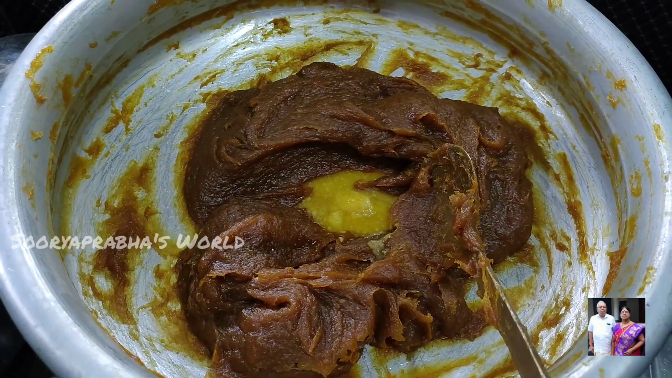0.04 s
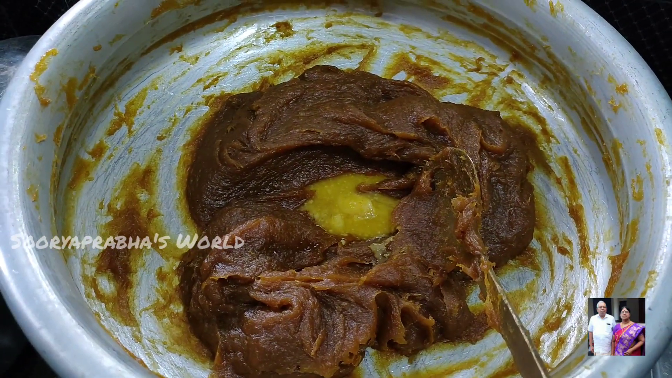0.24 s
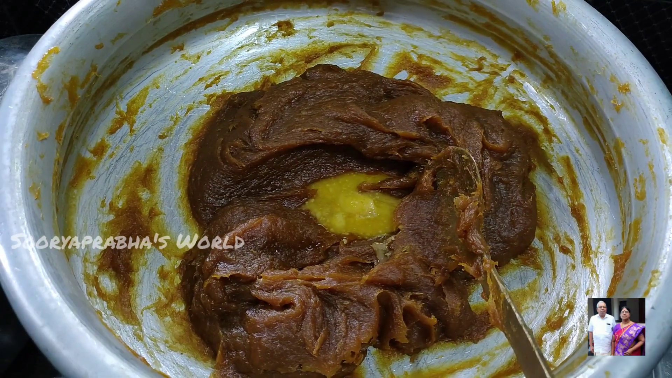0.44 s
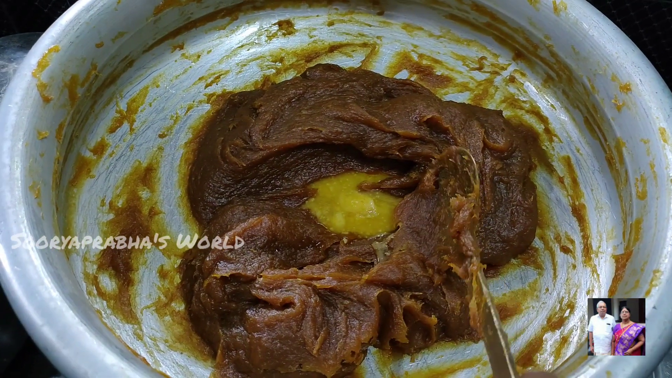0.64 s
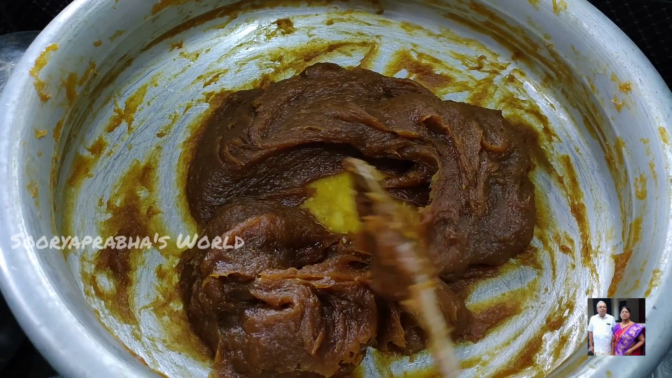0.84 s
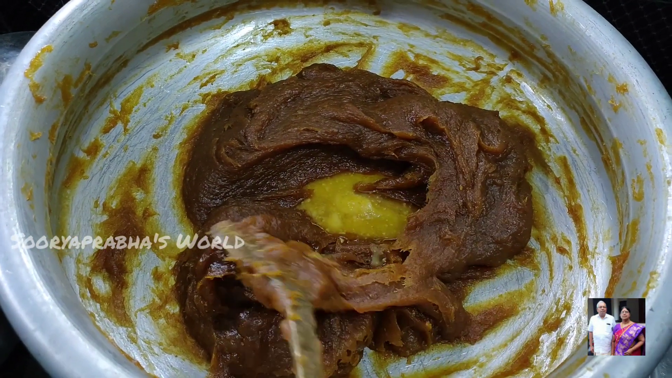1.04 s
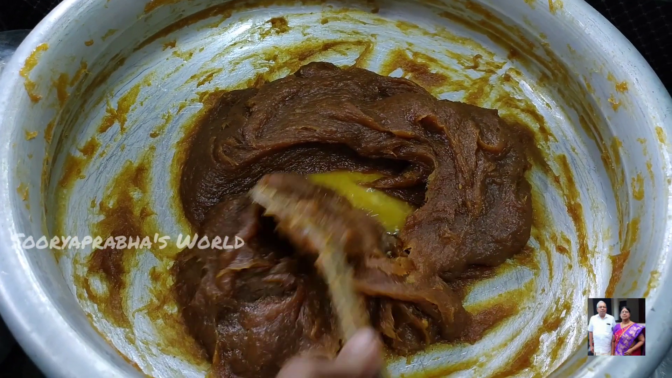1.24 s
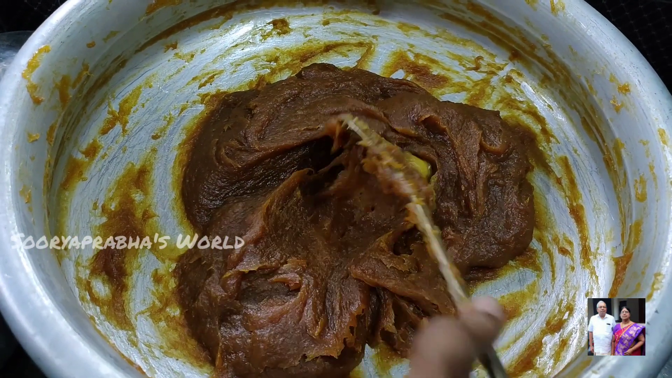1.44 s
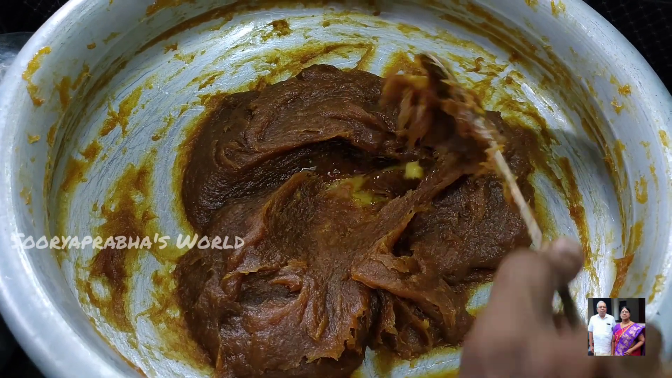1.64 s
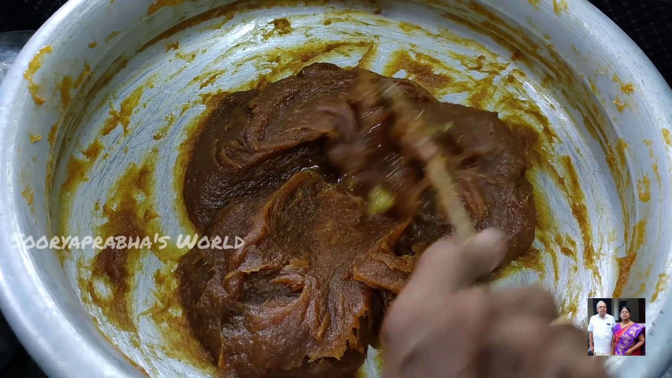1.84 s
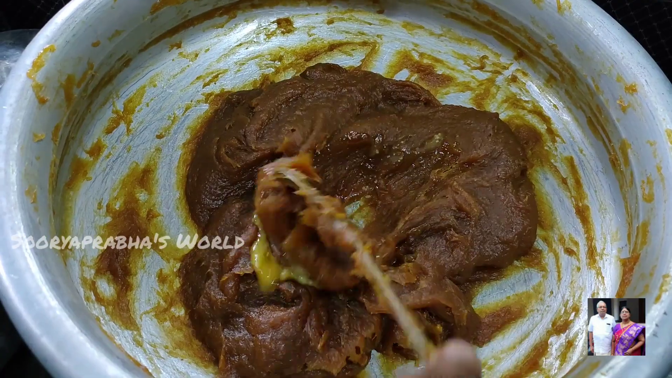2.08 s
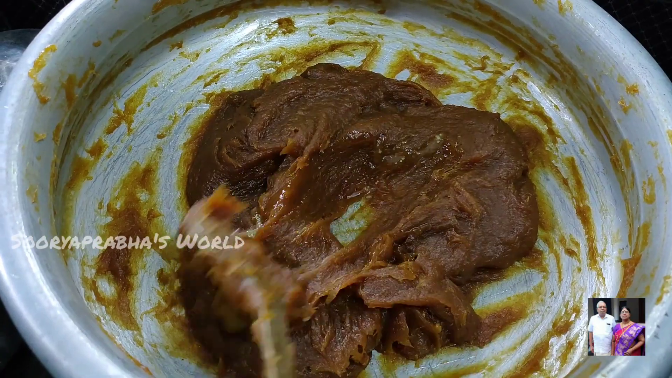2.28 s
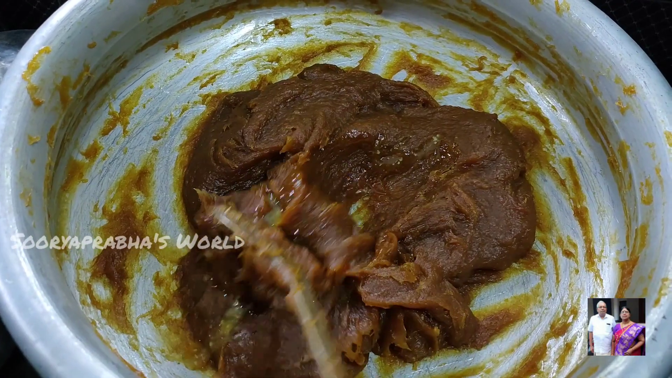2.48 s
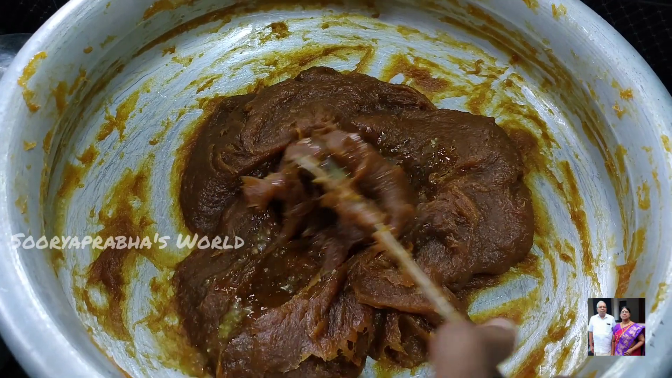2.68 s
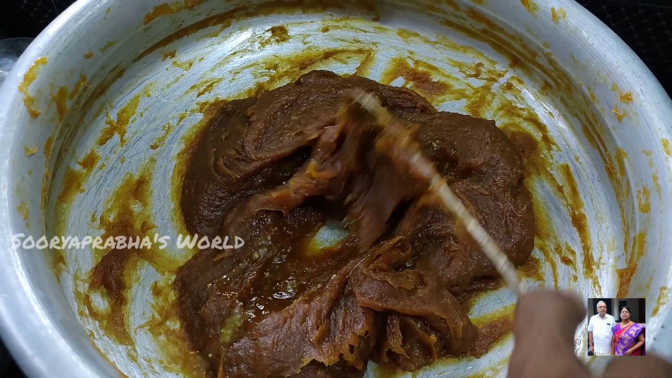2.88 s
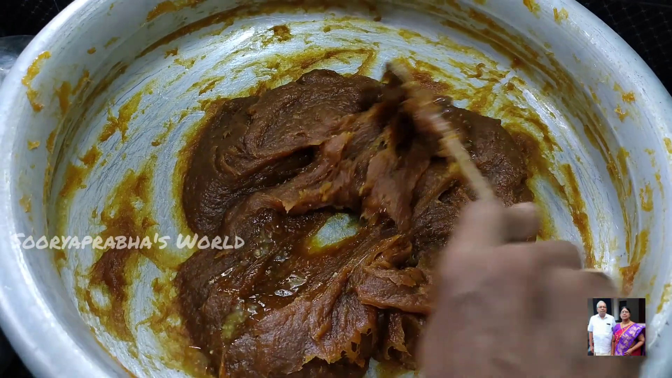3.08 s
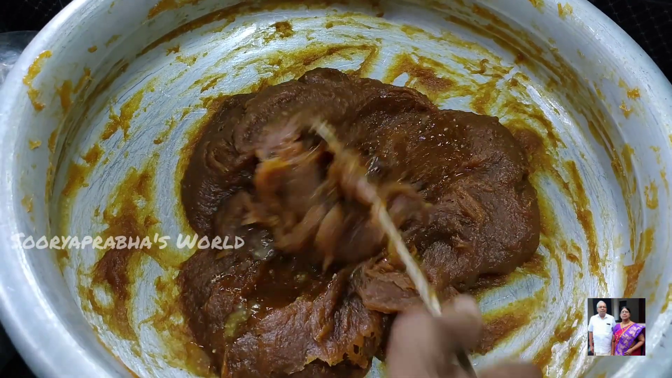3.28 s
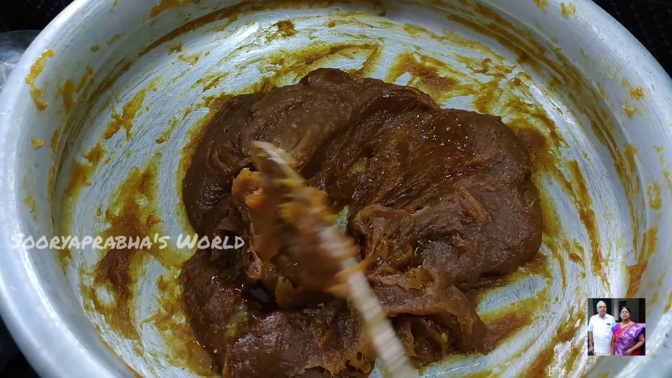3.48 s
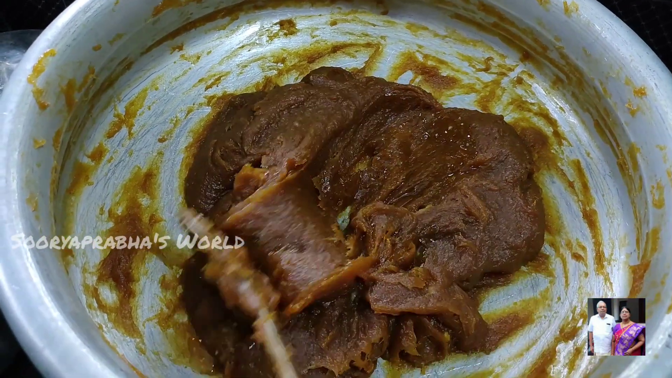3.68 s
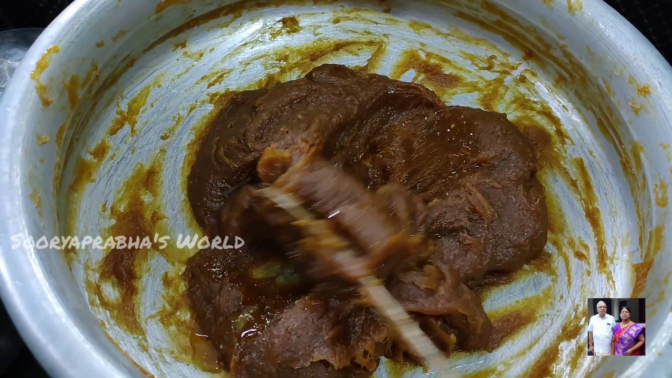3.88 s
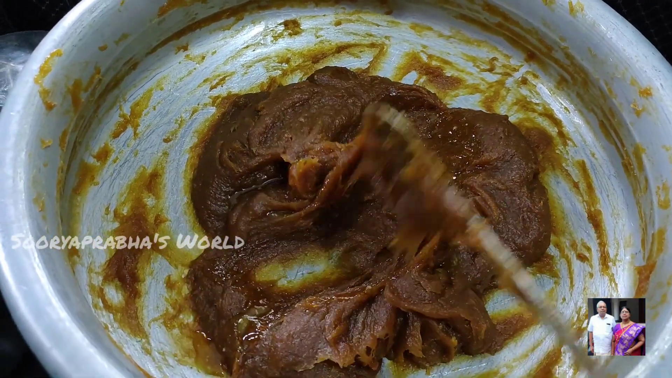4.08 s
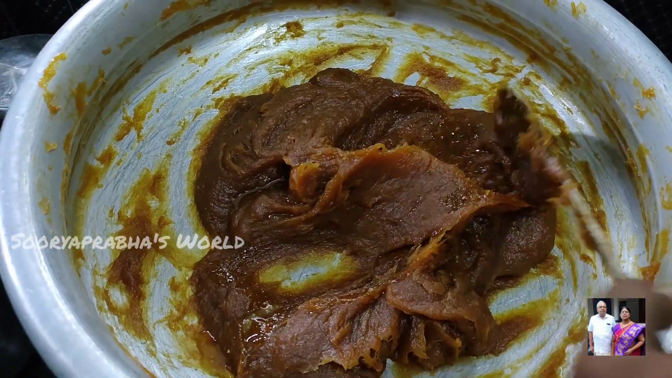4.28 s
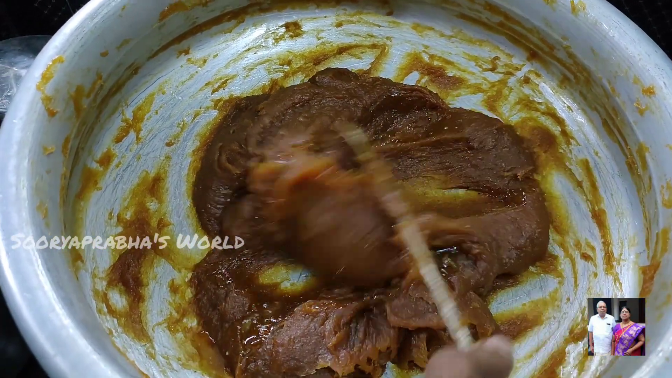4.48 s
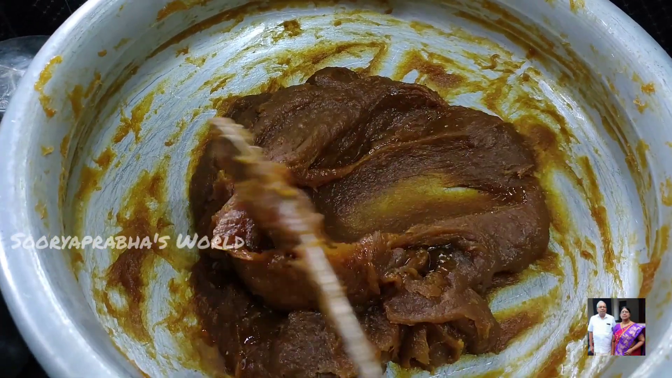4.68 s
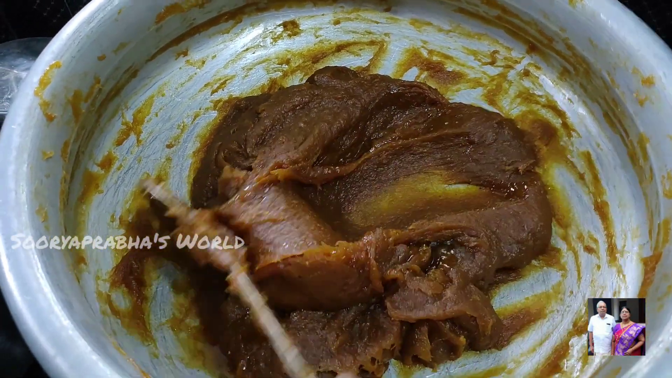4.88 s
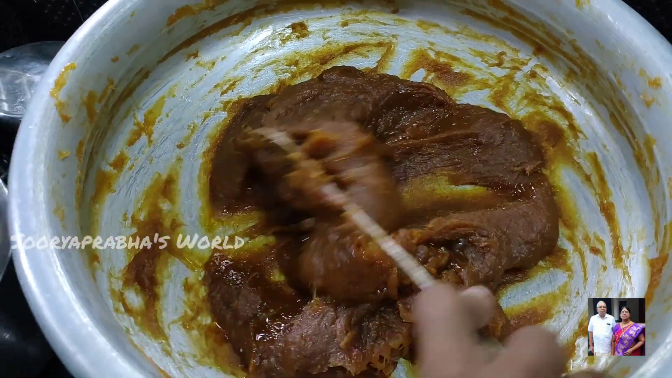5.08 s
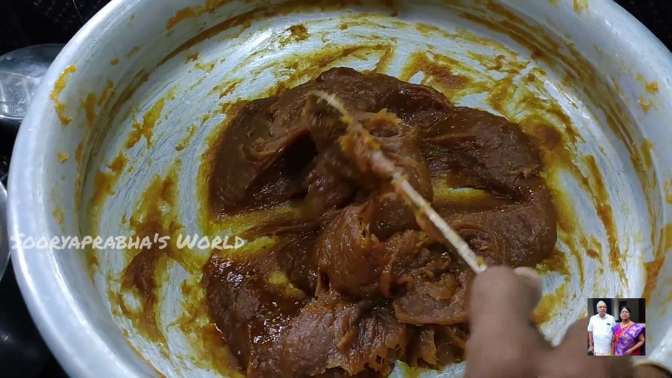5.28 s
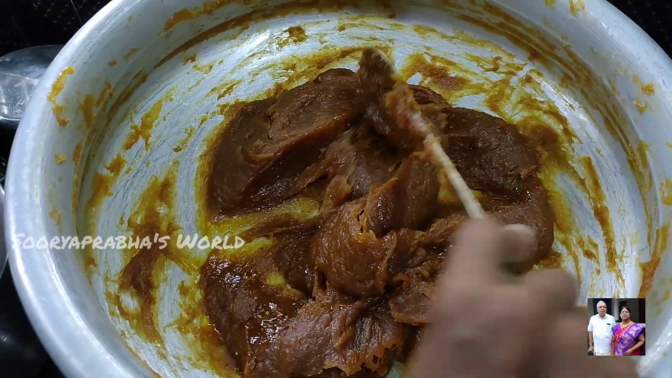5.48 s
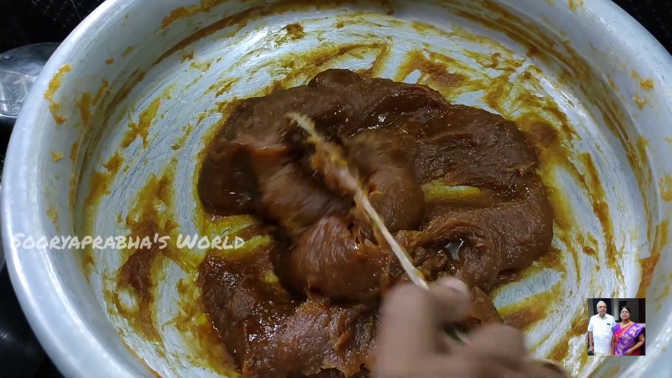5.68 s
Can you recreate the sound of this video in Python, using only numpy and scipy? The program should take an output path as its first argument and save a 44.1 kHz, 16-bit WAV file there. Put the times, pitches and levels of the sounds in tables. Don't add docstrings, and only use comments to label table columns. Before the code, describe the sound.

A metal ladle stirs dense paste in a wide metal pan. After faint sticky clicks and a blade brush, low hollow knocks and rough scrapes arrive roughly every six tenths of a second, with quiet wet peeling between. A strong blow comes late, then a bright rim rattle. Close band-limited phone sound, short kitchen reverberation, faint sizzle.

```python
import sys
import numpy as np
from scipy import signal
from scipy.fft import rfft, irfft, next_fast_len
from scipy.io import wavfile
from scipy.ndimage import uniform_filter1d, map_coordinates

SR = 44100
rng = np.random.default_rng(int(sys.argv[2]) if len(sys.argv) > 2 else 0)


def unload_wav(signal):
    wavfile.write(
        sys.argv[1],
        SR,
        np.round(np.clip(np.atleast_2d(signal).T, -1, 1) * 32767).astype(np.int16),
    )


def elevation(decibels):
    levels = np.asarray(decibels, float)
    return 10 ** (levels / 20)


N = 252781

# (time [s], main mode [dB], lower mode against it [dB], hardness [dB], push [dB])
LANDINGS = [
    (1.2510, -37.5, -7.5, 0, -36),
    (1.9625, -41.5, -5.5, 1.5, -30.5),
    (2.4964, -37.5, -18.5, 1.5, -34),
    (3.1854, -44.5, -20, -4, -26.5),
    (3.7555, -40.5, -5.5, -2, -26.5),
    (4.4262, -45, -8, -11, -29.5),
    (4.9631, -34, -1.5, 2.5, -16),
    (5.6544, -53, 3, 2.5, -28),
]
# (frequency [Hz], level [dB], T60 [s])
PAN_MODES = [(232.3, -1.86, 0.78), (286, 1, 0.55), (329.8, 0.4, 0.33), (287.4, -4, 0.066),
             (705, -14, 0.088), (122, -19, 0.99), (180, -13.5, 0.51), (392, -7, .4), (423.6, -5.5, 0.2),
             (489.4, -10.5, 0.53), (632.4, -14, 0.31), (744, -8.5, 0.12), (845, -9.5, .22),
             (928, -12, 0.14), (1150, -16, 0.29)]
# (time [s], hiss [dB], wall body against hiss [dB], pan floor against body [dB], fade [dB/s])
SKIDS = [
    (0, -54.5, -6.5, 1, 100),
    (0.157, -57.5, -22, -22, 45),
    (1.253, -43, 5.5, -3, 110.5),
    (1.963, -40.5, -1, -12.5, 122),
    (2.498, -41.5, 2, 2.5, 115),
    (3.187, -52, 0, -6, 150),
    (3.755, -52.5, 5, 8.5, 94.5),
    (4.427, -62.5, 10, 3, 97.5),
    (4.965, -31, 2.5, 5.5, 126),
    (5.589, -41, -6.5, -31, 76),
]
# (time at full pressure [s], hiss [dB], wall body against hiss [dB], hold [s], build-up [dB/s])
PUSHES = [
    (0.688, -57.5, 6.5, 0.023, 260),
    (1.407, -48.5, 1, 0.014, 89),
    (2.685, -51.5, 0.5, 0.021, 74.5),
    (3.249, -46, -2, 0.1, 131),
    (3.917, -56, 4.5, 0.0079, 67),
    (4.452, -43, -3.5, 0.0089, 598),
    (5.202, -57.5, 6, 0.033, 67),
]
# (time [s], hiss [dB], wall body against hiss [dB], length [s])
PEELS = [(0.118, -61, -20, .03), (0.372, -60, -11, 0.047), (0.576, -76, -20, 0.032),
         (0.834, -60.5, 0.5, 0.058), (0.92, -62.5, -10, 0.033), (1.176, -71.5, 7, 0.046),
         (1.583, -68, -17, 0.28), (1.758, -67.5, 1.5, 0.1), (1.808, -58, -8, 0.03), (1.912, -63, 1, 0.18),
         (2.17, -60, -30, 0.043), (2.243, -64, -30, 0.21), (2.344, -60.5, -18, 0.2), (2.81, -67, -6, 0.18),
         (3.081, -57, -6, .06), (3.497, -64, 2.5, 0.13), (3.595, -60.5, -7, 0.078), (4.05, -82, -12, 0.047),
         (4.17, -63, -13, 0.051), (4.276, -70.5, -8, 0.2), (4.596, -75, 8.5, 0.1), (4.926, -51, -11, 0.089),
         (5.286, -73.5, 14, 0.083), (5.374, -60, -9, 0.019), (5.567, -64, 4, .02)]
# (frequency [Hz], density [dB/Hz])
EDGE_HISS = [(2530, -24), (4300, -14.5), (4480, -15.5), (5020, -15.5), (5890, -5.5), (6450, -4),
             (7220, -13), (7690, -17.5), (7880, -28), (8230, -39), (10700, -72.5), (18100, -120)]
# (frequency [Hz], density [dB/Hz])
WALL_BODY = [(320, -3.5), (550, -3), (614, 4.5), (803, -2.5), (873, -2), (1780, -2.5), (2120, -1),
             (4480, -2.5), (5000, -16.5), (6500, -39.5), (11000, -120)]
# (frequency [Hz], level [dB], T60 [s], swell [s])
RIM_MODES = [(1178, -43, .65, .02), (1301, -46, .9, .012), (1828, -51, .4, .005), (2062, -42, .45, .008),
             (2081, -41, .55, .008), (2989, -48, .4, .01), (3707, -49, .35, .015), (3776, -51, .3, .004),
             (3959, -49, .7, .012), (4007, -52, .25, .003), (4422, -38, .22, .004), (5337, -43, .3, .002),
             (5667, -46, .35, .002), (5727, -43, .28, .004), (5780, -45, .4, .002), (5851, -37, .25, .002),
             (5872, -34, .28, .003), (6455, -42, .2, .005), (6920, -46, .3, .002), (6979, -42, .35, .001),
             (7021, -39, .28, .002), (7107, -42, .22, .006), (7406, -51, .35, .012), (7626, -54, .25, .012)]
# (frequency [Hz], level [dB], T60 [s], swell [s])
BLADE_MODES = [(280, -69.5, 0.72, 0.017), (503, -64.5, 0.62, 0.036), (640, -62.5, 0.53, 0.03),
               (745, -52, .3, 0.023), (1027, -51, 0.24, 0.029), (1174, -44, 0.34, 0.056),
               (1290, -43.5, 0.39, 0.074), (1250, -79, 1.7, .06), (1345, -51, 0.35, 0.028),
               (1820, -59, 0.34, 0.037), (2073, -50.5, 0.29, 0.034), (2770, -63, 0.41, .03),
               (2770, -59.5, 0.58, .06), (2840, -67, 0.81, .03), (3569, -61, 0.18, 0.043),
               (4500, -61, 0.43, .05), (5270, -64.5, .35, .03), (5660, -56, 0.33, .05),
               (6260, -62, 0.48, 0.033), (6450, -64, 0.42, .03), (7140, -60, 0.43, .03)]
# (time [s], peak [dB], pitch [Hz], T60 [s])
TICKS = [(0.0245, -47, 6080, 0.076), (0.156, -48.5, 5800, 0.11), (0.6862, -50, 6620, 0.06),
         (0.745, -49.5, 6600, 0.088), (1.6551, -58.5, 6270, 0.086), (1.7796, -57, 6030, 0.06),
         (1.81, -57.5, 1100, 0.11), (1.9006, -60, 6200, .08), (2.8968, -54.5, 3000, 0.042),
         (3.089, -61, 3720, 0.063), (3.092, -57.5, 2400, 0.093), (4.0567, -55, 5630, 0.044),
         (4.1596, -54, 6350, 0.12), (4.8509, -57, 6200, 0.022), (4.9062, -67, 2400, 0.063),
         (4.9362, -35, 5860, 0.017), (4.94, -57, 6100, 0.13), (4.9523, -41, 5950, 0.048)]
# (time [s], length [s], pitch [Hz], width [Hz], level [dB])
SLIDES = [(0, 0.11, 1150, 260, -55), (.19, 0.4, 1230, 320, -75.5), (0.375, 0.27, 1760, 350, -74.5),
          (0.67, 0.13, 122, 9.4, -73), (1.028, 0.36, 1720, 700, -77), (1.899, 0.088, 290, 450, -60),
          (2.407, 0.045, 640, 130, -69), (2.901, 0.11, 1254, 120, -79.5), (3.063, 0.17, 636, 13, -75),
          (3.495, 0.055, 624, 450, -64), (3.622, 0.14, 1254, 17, -76), (4.7, 0.14, 1245, 76, -81),
          (5.2, .2, 640, 150, -65), (5.46, .1, 1245, 50, -79), (3.852, 0.2, 122, 17, -71),
          (4.442, 0.065, 4250, 530, -48.5), (4.445, 0.028, 6510, 70, -35.5), (4.44, 0.035, 7300, 150, -47),
          (4.805, 0.028, 6380, 88, -62.5), (5.567, 0.022, 6300, 540, -77)]
# (time [s], length [s], level [dB])
TREMBLES = [
    (.005, 0.15, -65.5),
    (0.157, 0.11, -62),
    (0.286, 0.14, -67.5),
    (0.379, 0.06, -71),
]
# (frequency [Hz], width [Hz], level [dB])
LADLE_TONES = [(2800, 160, -9.5), (3930, 76, -6), (4720, 150, -7.5), (5800, 140, 2.5), (6270, 260, -1)]
# (frequency [Hz], density [dB/Hz])
SIZZLE = [(20, 4.0), (150, -9.5), (280, -10.5), (640, -15), (920, -16.5), (1250, -18.0), (2500, -13),
          (4150, -11.0), (4400, -2.5), (4900, -3.5), (5250, -9.5), (6400, -2), (7600, -11), (8300, -25.0),
          (9000, -120)][:]
# (frequency [Hz], T60 [s])
KITCHEN = [(150, 0.91), (600, 0.76), (2500, 0.49), (7000, 0.3)]
# (frequency [Hz], gain [dB])
MIC = [(20, -49.5), (100, -17), (190, -3), (2000, -2.5), (5000, 0.5), (6300, 5), (7400, 10), (8000, -24),
       (8500, -40.5), (9500, -32), (16000, -49)]
# (time [s], level [dB])
FLINCHES = [
    (3.7592, -66),
    (4.9685, -59),
    (4.9716, -57.5),
    (5.5962, -45.5),
    (5.608, -52),
]


def unit(x):
    return x / np.sqrt(np.mean(x ** 2) + 1e-20)


def along(points, hz):
    f, v = np.transpose(points)
    return np.interp(np.log(hz + 1), np.log(f + 1), v)


def filtered(x, response):
    m = next_fast_len(N + SR)
    return irfft(rfft(x, m) * response(np.fft.rfftfreq(m, 1 / SR)), m)[:N]


def causal(points):
    cepstrum = irfft(np.log(elevation(along(points, np.fft.rfftfreq(4096, 1 / SR)))))
    cepstrum[1:2048] *= 2
    cepstrum[2049:] = 0
    return irfft(np.exp(rfft(cepstrum)))


def modes(table):
    def response(f):
        total = 0
        for k, (hz, db, t60) in enumerate(table):
            damping = 1j * f * np.log(1000) / np.pi / t60
            total = total + (-1) ** k * elevation(db) * SR / np.pi * 1j * f / (hz * hz - f * f + damping) / 2
        return total
    return response


def patchy(depth_db):
    z = signal.stft(rng.standard_normal(N), nperseg=512)[2]
    field = uniform_filter1d(rng.standard_normal(z.shape), 5, 0)
    field = uniform_filter1d(field, 10, 1)
    return signal.istft(z * elevation(depth_db * unit(field)), nperseg=512)[1][:N]


def grit(rate, spread_db):
    slips = rng.random(N) < rate / SR
    sign_and_size = slips * rng.standard_normal(N)
    return unit(sign_and_size * elevation(spread_db * np.minimum(rng.exponential(size=N), 3)))


def burst(t, length, rise):
    return (1 - np.exp(-t / rise)) * elevation(-20 * t / length)


def tail(length):
    hz, t, z = signal.stft(rng.standard_normal(length), SR, nperseg=256)
    x = signal.istft(z * elevation(-60 * t / along(KITCHEN, hz)[:, None]), SR, nperseg=256)[1][:length]
    return x / np.linalg.norm(x)


def knocks():
    out, t = np.zeros(N + SR), np.arange(SR) / SR
    for start, db, lower_db, hard_db, push_db in LANDINGS:
        upper_db = hard_db - 6.5
        shares = [lower_db, 0, upper_db, *(hard_db + rng.normal(0, 2.5, len(PAN_MODES) - 3))]
        wander = rng.standard_normal((len(PAN_MODES), 30))
        ring = 0
        for share, knots, (hz, mode_db, t60) in zip(shares, wander, PAN_MODES):
            loading = map_coordinates(knots, [t * 22]) * np.minimum(t / 0.03, 1)
            level = db + mode_db + share + 3.5 * np.minimum(loading, 1) - 60 * t / t60
            ring = ring - elevation(level) * np.sin(2 * np.pi * hz * t)
        push = -np.sin(2 * np.pi * 340 * t) * elevation(push_db + 5.5 - 60 * t / 0.0086) * (1 - np.exp(-t / 0.001))
        push += elevation(-6.5) * np.pad(push, (round(0.0185 * SR), 0))[:SR]
        crack = elevation(db + hard_db - 7 - 60 * t / 0.026) * rng.standard_normal(SR)
        wet = np.pad(signal.fftconvolve(push + crack, tail(SR)), (330, 0))[:SR]
        out[round(start * SR):][:SR] += elevation(-0.47) * ring + push + crack + elevation(-4.5) * wet
    return out[:N]


def contact():
    t, power = np.arange(N) / SR, np.zeros((3, N))

    def add(level, body_db, boom_db):
        power[:] += (level * elevation([[0], [body_db], [body_db + boom_db]])) ** 2

    for start, db, body_db, boom_db, fade in SKIDS:
        bite = np.clip((t - start + 0.002) / 0.0021, 0, 1)
        add(bite * elevation(db - fade * np.abs(t - start)), body_db, boom_db)
    for full, db, body_db, hold, press in PUSHES:
        landed = t > max(row[0] for row in SKIDS if row[0] < full)
        build_up = press * np.maximum(full - t, 0)
        release = 156.5 * np.maximum(t - full - hold, 0)
        add(landed * elevation(db - build_up - release), body_db, -9)
    for start, db, body_db, length in PEELS:
        add(elevation(db) * burst(np.maximum(t - start, 0), 2.4 * length, rise=0.01), body_db, -6.5)
    return np.sqrt(power)


def drag():
    def edge():
        return elevation(-4.0) * grit(rate=6000, spread_db=4.0) + patchy(depth_db=2.5)

    hiss = unit(filtered(edge(), lambda f: elevation(along(EDGE_HISS, f))))
    body = unit(filtered(edge(), lambda f: elevation(along(WALL_BODY, f)) * f ** 2 / (f ** 2 + 200 ** 2)))
    boom = unit(filtered(edge(), lambda f: modes(PAN_MODES)(f) * (f ** 2 / (f ** 2 + 140 ** 2)) ** 2))
    scrape = np.sum(contact() * [hiss, elevation(-4.0) * body, elevation(-6.0) * boom], axis=0)
    return elevation(-2.02) * (scrape + elevation(-13.5) * signal.fftconvolve(scrape, tail(SR))[:N])


def chatter(start, table, rough_db, rate, softness):
    out, t = np.zeros(N + SR), np.arange(SR // 2) / SR
    for hz, db, t60, swell in table:
        flutter, drift = (map_coordinates(k, [t * rate]) for k in rng.standard_normal((2, 100)))
        level = elevation(db + rough_db * flutter - 60 * t / t60) * (1 - np.exp(-t / swell)) ** softness
        phase = rough_db / 5 * drift + 7 * rng.random()
        out[round(start * SR):][:len(t)] += level * np.sin(2 * np.pi * hz * t + phase)
    return out[:N]


def rim():
    ring = chatter(5.5866, RIM_MODES, rough_db=3.5, rate=70.2, softness=0.73)
    return elevation(1.0) * ring + elevation(-23.0) * signal.fftconvolve(ring, tail(SR))[:N]


def blade():
    return elevation(5.5) * chatter(0.632, BLADE_MODES, rough_db=4.5, rate=33.2, softness=2.26)


def ticks():
    out, t = np.zeros(N + SR), np.arange(SR // 4) / SR
    for start, db, hz, t60 in TICKS:
        peak = signal.iirpeak(hz, 6, SR)
        band = signal.lfilter(*peak, signal.lfilter(*peak, rng.standard_normal(len(t))))
        snap = elevation(-5 - 60 * t / 0.024) * np.sin(2 * np.pi * hz * t)
        puff = elevation(-10.5 - 60 * t / t60) * unit(band)
        onset = 1 - np.exp(-t / (0.012 * t60))
        out[round(start * SR):][:len(t)] += elevation(db) * onset * (snap + puff)
    return out[:N]


def slides():
    out, t, f = np.zeros(N + SR), np.arange(SR) / SR, np.arange(SR // 2 + 1)
    trembling = [(start, length, hz, width, db + tone_db)
                 for start, length, db in TREMBLES for hz, width, tone_db in LADLE_TONES]
    for start, length, hz, width, db in SLIDES + trembling:
        hollow = (f * width / (hz * hz - f * f + 1j * f * width)) ** 2
        hum = unit(irfft(rfft(rng.standard_normal(SR)) * hollow, SR))
        out[round(start * SR):][:SR] += elevation(db) * hum * burst(t, 1.75 * length, rise=0.0071)
    return out[:N]


def quiet():
    return elevation(-70) * unit(filtered(patchy(depth_db=1.86), lambda f: elevation(along(SIZZLE, f))))


def scene():
    struck = signal.fftconvolve(knocks() + ticks(), causal(MIC))[:N]
    return (struck + rim() + blade() + drag() + slides() + quiet())[None]


def roll_off(x):
    return signal.sosfilt(signal.butter(12, 15800, fs=SR, output="sos"), x)


def record(dry):
    band = signal.sosfilt(signal.ellip(8, 0.2, 70, 8150, fs=SR, output="sos"), dry)
    overloaded = band - 0.9 * band ** 3
    t = np.arange(N) / SR
    flinch = sum(elevation(db - 60 * np.abs(t - start) / 0.0088) for start, db in FLINCHES)
    spit = flinch * filtered(rng.standard_normal(N), lambda f: (f > 8000) * (8000 / (f + 1)) ** 4.5)
    hiss = filtered(rng.standard_normal(N), lambda f: f < 15800)
    return roll_off(overloaded + spit + elevation(-97) * hiss)


dry = scene()
out = record(dry)
unload_wav(out)
```